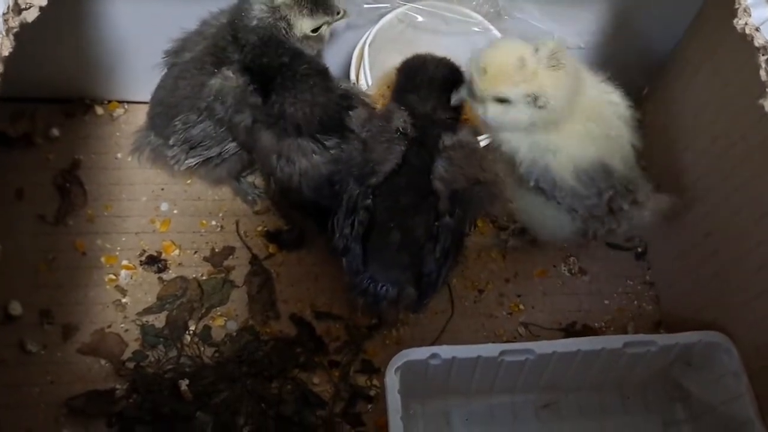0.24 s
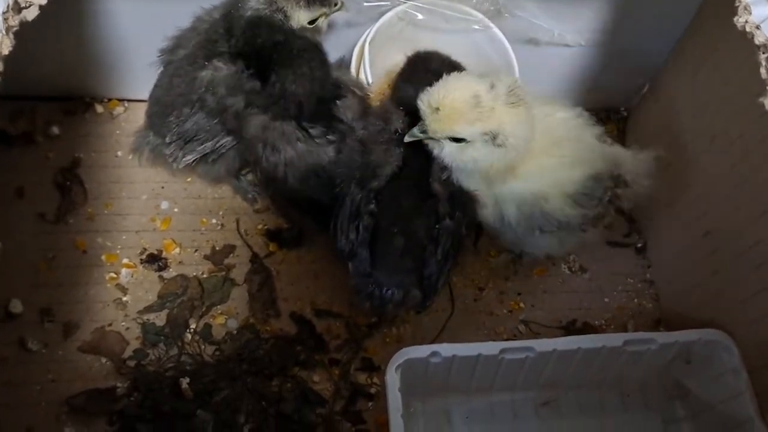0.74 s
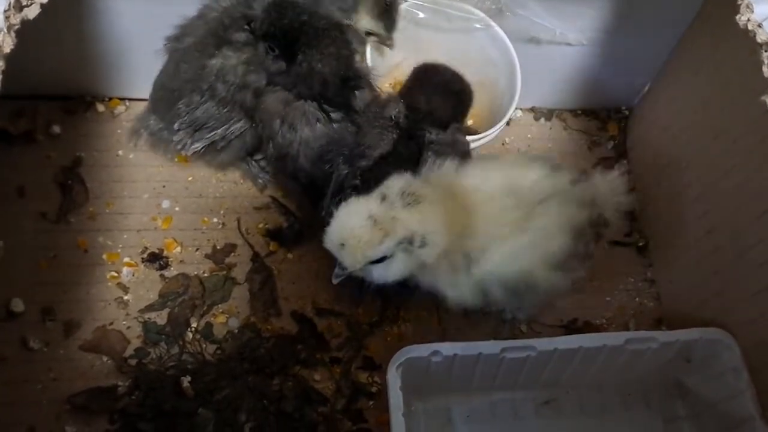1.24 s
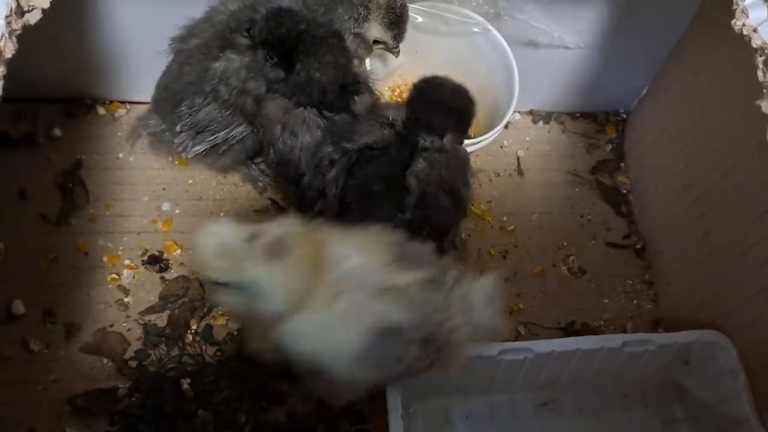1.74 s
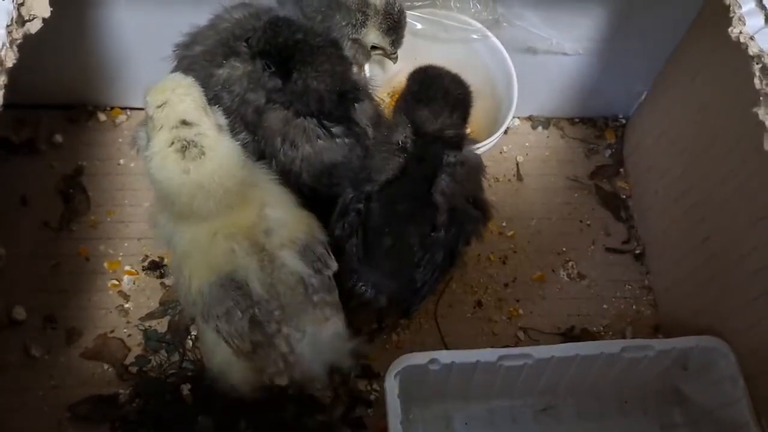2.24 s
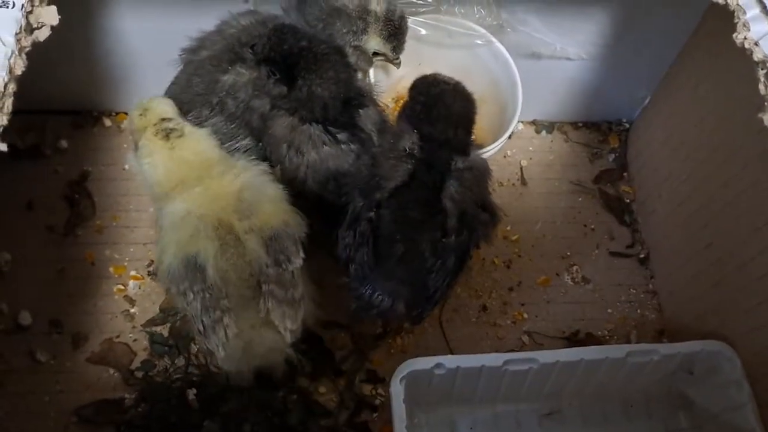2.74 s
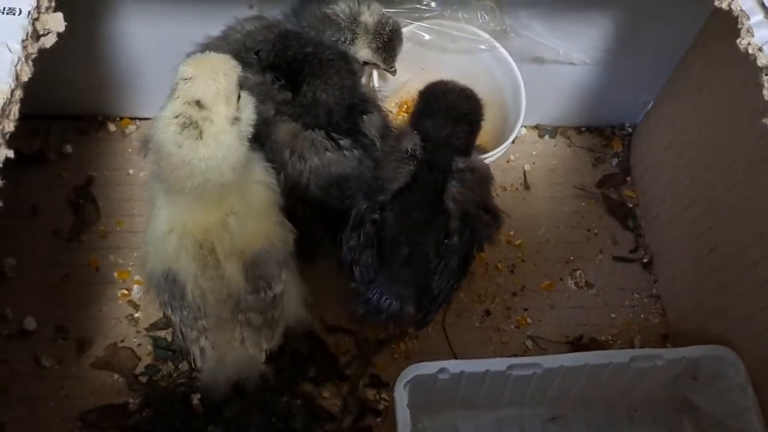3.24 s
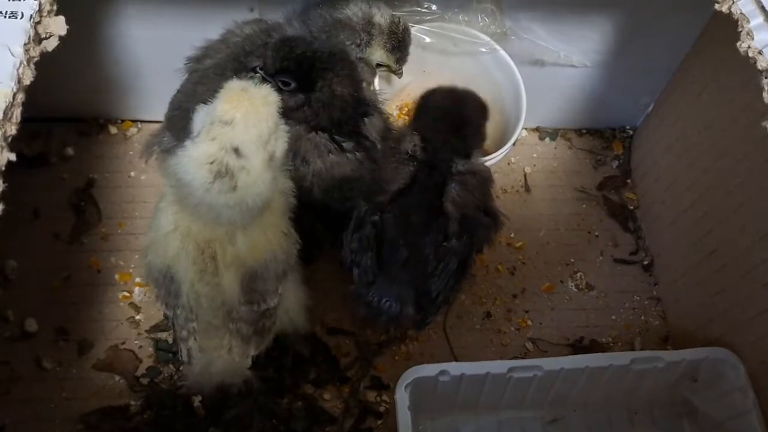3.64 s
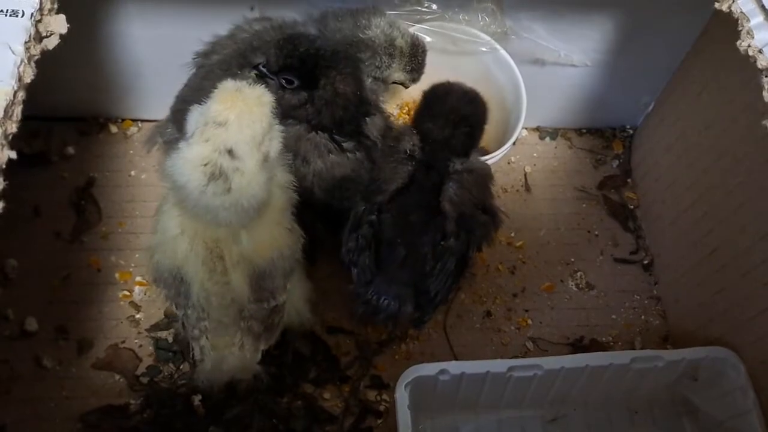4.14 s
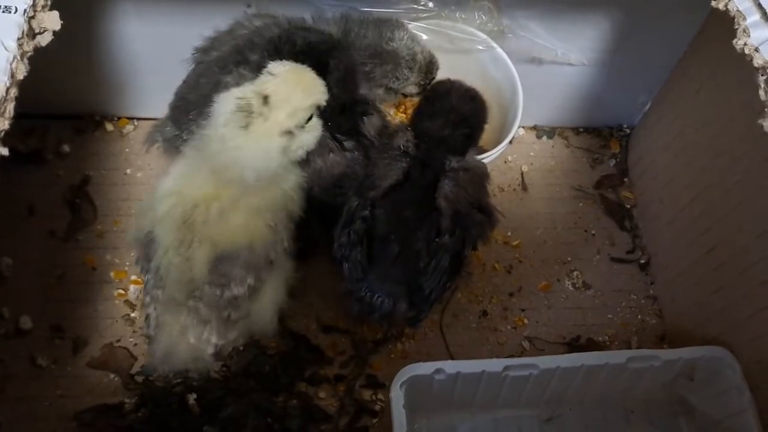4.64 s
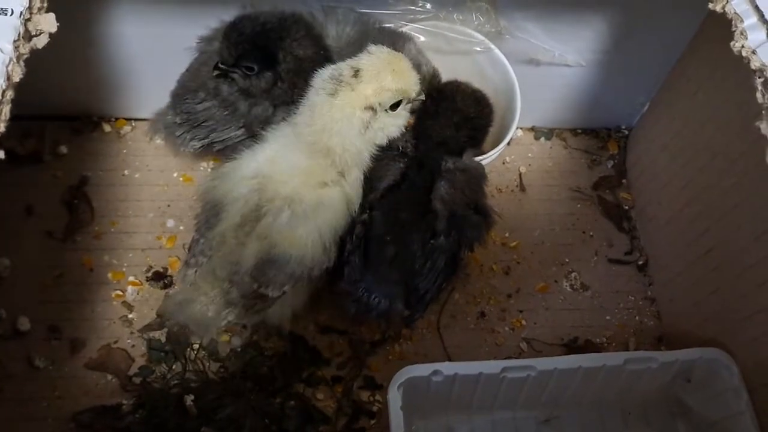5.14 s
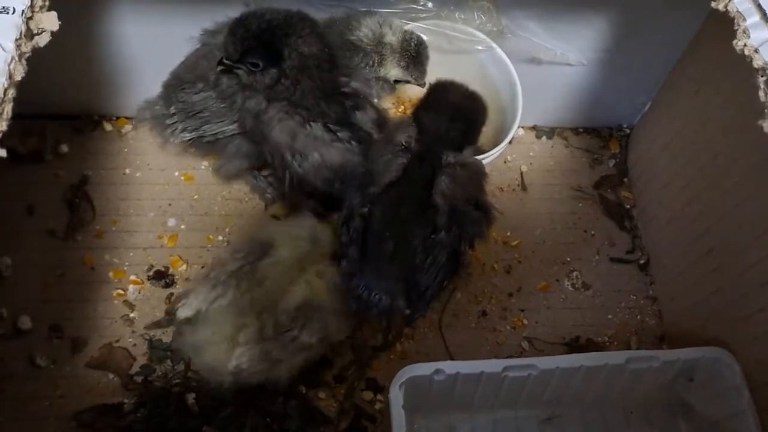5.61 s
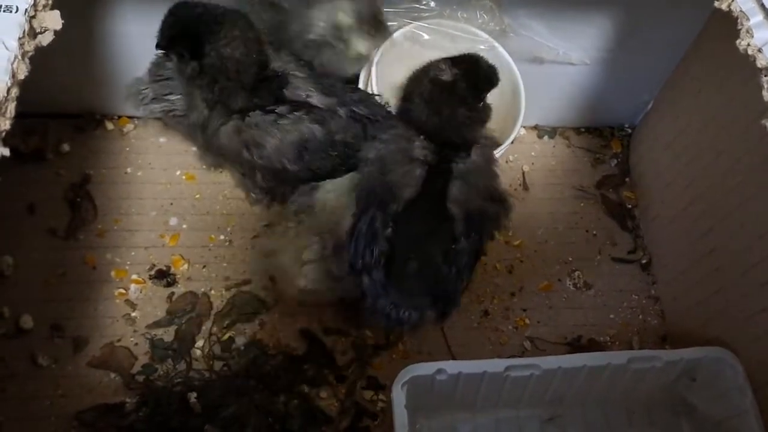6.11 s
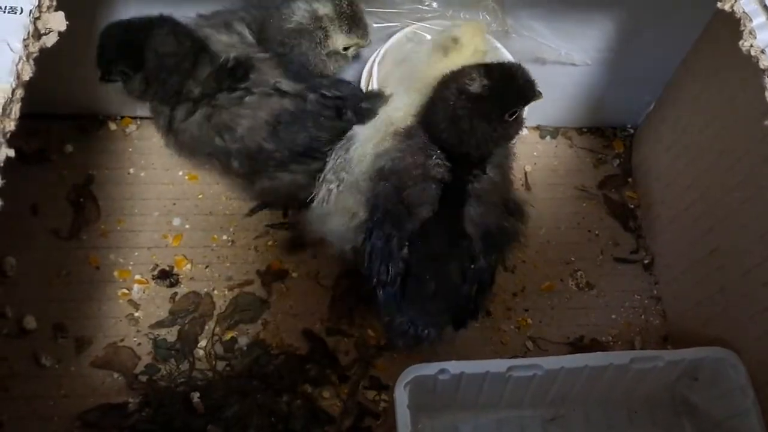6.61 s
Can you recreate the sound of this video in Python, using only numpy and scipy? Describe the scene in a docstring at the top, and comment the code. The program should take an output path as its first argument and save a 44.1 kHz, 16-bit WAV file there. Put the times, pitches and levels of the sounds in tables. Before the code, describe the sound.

Chicks jostle inside a cardboard box in a quiet room, heard in close stereo. Short dry scuffs, claw ticks and soft falling peeps come first, then a burst of hollow, drumming footfalls a little past two seconds. The movement thins to a near-still pause, light fidgeting resumes, and from five seconds scratching, thumps and quick peeps crowd together to the end.

```python
"""Chicks jostle round a plastic feed dish in a cardboard box, heard from close by in a quiet room.
Short scuffs and soft peeps come first: noise-burst grains make claws and feathers, gliding sines the peeps.
From 2.2 to 3 s footfalls drum hardest, pulses ringing the box modes; near 3.6 s the birds freeze.
Light fidgeting resumes, then from 5 s scuffs, footfalls and peeps crowd together to the end.
Noise-burst ticks, knocks and crumb snaps accompany the scuffs and echo off the walls, over a faint noise hush."""
import sys
import numpy as np
from scipy import signal
from scipy.fft import rfft, irfft
from scipy.io import wavfile
from scipy.ndimage import uniform_filter1d

SR = 44100
rng = np.random.default_rng(int(sys.argv[2]) if len(sys.argv) > 2 else 0)


def waveform_to_disk(signal):
    """Save audio, clipped to [-1, 1], as 16-bit WAV at the path in sys.argv[1]."""
    frames = np.transpose(np.atleast_2d(signal))
    scaled = np.clip(frames, -1, 1) * 32767
    samples = np.round(scaled).astype(np.int16)
    wavfile.write(sys.argv[1], SR, samples)


N = 302967
T = np.arange(N) / SR
CLAW_SHAPE = (0.027, 151)  # scuff rise [s], fall [dB/s]

# floor panel spectrum: (frequency [Hz], level [dB])
PANEL_SPECTRUM = [(200, -38), (320, -2.5), (400, -2), (510, 2), (630, 0.5), (790, -1.5), (1000, -10.5),
                  (1400, -9), (2200, -16.5), (4000, -35.5)]


def claws(scrape_db=-5.0, panel_db=-0.5):
    """Claws stick and slip on gritty cardboard; the same slips rattle the floor panel."""
    # claw scrape spectrum: (frequency [Hz], level [dB])
    scrape_spectrum = [(300, -46.5), (800, -1.5), (1300, 5), (1750, 4), (2300, 10), (3100, 10), (3700, 5.5),
                       (4400, 5.5), (5600, 0.5), (9000, -35), (11000, -31), (13500, -33), (16000, -2.5)]
    panel_shape = (0.019, 162)  # rise [s], fall [dB/s]
    slips = grains(per_s=1100, spread_db=1.0, clump_db=1.0, clumps_per_s=160)
    scrape = crackle(slips, scrape_spectrum, direct=0.093)
    scrape *= amp(scrape_db) * effort(CLAW_SHAPE, fidget_db=-59.5, column=2)
    panel = crackle(slips, PANEL_SPECTRUM, direct=0.07)
    panel *= amp(panel_db) * effort(panel_shape, fidget_db=-74.5, column=4)
    return scrape + panel


def feathers(hiss_db=-1):
    """Countless barbs flick past each other in a fine hiss."""
    # feather hiss spectrum: (frequency [Hz], level [dB])
    feather_spectrum = [(1000, -5), (4000, -1.5), (6000, -1.5), (7600, 2.5), (9200, 1), (10300, -6),
                        (12000, -12), (14000, -11), (16000, -20)]
    feather_shape = (0.029, 230)  # rise [s], fall [dB/s]
    barbs = grains(per_s=4500, spread_db=3.5, clump_db=1.66, clumps_per_s=120)
    hiss = crackle(barbs, feather_spectrum, direct=0.026)
    return amp(hiss_db) * effort(feather_shape, fidget_db=-60.5, column=3) * hiss


def crumbs(per_s=26, over_scrape_db=19, spread_db=3):
    """Grains of feed and dry litter snap under the feet, louder when the scraping is hard."""
    out, t = np.zeros((2, N)), np.arange(600) / SR
    scraping = effort(CLAW_SHAPE, fidget_db=-73.5, column=2)
    for place, size, shine in rng.random((round(per_s * N / SR), 3)):
        snap = rng.standard_normal(len(t)) * np.exp(-t / .0004)
        top_db = -30 + 18 * shine
        snap = colour(snap, [(300, -12.0), (1300, 13.0), (2500, -1.5), (4800, 3.0), (14000, top_db)])
        db = over_scrape_db + spread_db * min(-np.log(1 - size), 2.5)
        level = amp(db) * scraping[int(place * N)]
        add(out, place * N / SR, in_box(level * snap / np.linalg.norm(snap), box_db=-3))
    return out


def ticks(decay_s=0.0015, skid_s=0.011, crack_db=15, treble_db=9, low_db=-8, body_share=0.067):
    """Claw and beak ticks: a dead crack and brief skid, dull on cardboard, bright on grit or the dish."""
    # claw and beak ticks: (time [s], level [dB], brightness [dB], skid [dB])
    tick_table = [(0.103, -27.5, -13, -8), (0.3301, -34, -18, -20), (0.3796, -21.5, -22, -14),
                  (0.5011, -34, -10, -6), (0.6704, -29, -3, -3), (0.7047, -44, -15, -12),
                  (0.828, -37, 4, -11), (0.9956, -32.5, -6, -8), (1.017, -33.5, -5, -10),
                  (1.1087, -32, -20, -12), (1.1355, -32.5, -6, -16), (1.1772, -33, -17, -16),
                  (1.288, -41.5, -5, -9), (1.374, -34, -18, -12), (1.79, -32, -21, -20),
                  (1.9078, -30.5, -17, -12), (1.921, -31, -14, -13), (2.0322, -29, 3, -23),
                  (2.3224, -21.5, -33, -15), (2.611, -26, -30, -14), (2.829, -44, -47, -16),
                  (2.873, -46, -7, -16), (4.179, -39, -30, -23), (4.1875, -30.5, -39, -22),
                  (4.5481, -31, -23, -13), (4.7984, -31.5, -12, -14), (4.8464, -40, -2, -14),
                  (4.876, -43, -25, -18), (4.9715, -29.5, -8, -18), (4.9847, -20.5, -25, -6),
                  (5.08, -29.5, -13, -27), (5.1593, -24, -19, -16), (5.1854, -23.5, -35, -17),
                  (5.4668, -27, -5, -16), (5.5523, -27.5, -33, -20), (5.588, -28.5, -28, -18),
                  (5.7651, -31.5, -13, -14), (5.8377, -26, -57, -17), (5.868, -27, -51, -6),
                  (6.0218, -20.5, -17, -12), (6.106, -27, -22, -15), (6.175, -23, -34, -7),
                  (6.274, -24, -3, -5), (6.3323, -27, -3, -8), (6.3745, -31.5, -20, -3),
                  (6.8069, -28, -14, -3)]
    out, t = np.zeros((2, N)), np.arange(1500) / SR
    for s, db, bright_db, skid_db in tick_table:
        envelope = np.exp(-t / decay_s) + amp(skid_db) * np.exp(-t / skid_s)
        top_db = bright_db + treble_db
        body_db = low_db - body_share * top_db  # a dull blow bends the cardboard more
        spectrum = [(150, -14), (600, body_db), (1400, body_db), (2300, -1.0), (4700, 2),
                    (11000, top_db), (16000, top_db - 8.5)]
        crack = colour(rng.standard_normal(len(t)) * envelope, spectrum)
        add(out, s, in_box(amp(db + crack_db) * crack / np.linalg.norm(crack), box_db=-5.5))
    return out


def knocks(knock_db=20, decay_s=0.0028, panel_hz=510):
    """A hard stamp or peck rattles the floor panel for a few milliseconds, higher where it is stiff."""
    # knocks of foot or beak: (time [s], level [dB], pitch [Hz])
    knock_table = [(0.33, -29, 555), (0.705, -36.5, 1270), (1.222, -40, 1300), (2.398, -30, 513),
                   (2.606, -30, 505), (2.829, -29.5, 710), (2.862, -34, 1210), (2.966, -36.5, 1280),
                   (3.993, -45, 393), (4.749, -47, 1300), (5.025, -39.5, 507), (5.562, -27.5, 490),
                   (6.176, -24.5, 510), (6.37, -32.5, 494)]
    out, t = np.zeros((2, N)), np.arange(3000) / SR
    for s, db, pitch_hz in knock_table:
        spectrum = [(hz * pitch_hz / panel_hz, level) for hz, level in PANEL_SPECTRUM]
        rattle = colour(rng.standard_normal(len(t)) * np.exp(-t / decay_s), spectrum)
        add(out, s, in_box(amp(db + knock_db) * rattle / np.linalg.norm(rattle), box_db=-2.5))
    return out


def peeps(bend=.85, waver=0.0034, rasp_db=2, octave_db=-27, upper_db=-7, upper_gap=0.12, peep_db=1.5):
    """Nearly pure gliding whistles; a weaker second voice starts higher and fades as it joins the first."""
    # peeps: (time [s], length [s], first pitch [Hz], last pitch [Hz], level [dB])
    peep_table = [(0.022, .042, 3750, 3050, -44), (0.194, 0.072, 2400, 3540, -57),
                  (0.677, 0.052, 3700, 2765, -41.5), (0.841, 0.063, 3430, 2930, -44.5),
                  (.915, .07, 3750, 2750, -41), (1.015, .048, 3480, 2930, -40),
                  (1.355, .06, 4050, 3200, -36), (1.742, .063, 4300, 3000, -47),
                  (2.17, .05, 3950, 3200, -41), (3.012, .046, 3600, 2956, -40.5),
                  (3.776, 0.058, 3520, 2940, -49), (4.509, 0.051, 3650, 2910, -44),
                  (4.647, .045, 2250, 2800, -52), (4.708, .08, 3750, 2700, -49),
                  (5.215, .038, 3350, 2900, -50), (5.315, .05, 3700, 3000, -43),
                  (5.697, .026, 2560, 2330, -42), (5.765, .04, 3750, 3250, -47),
                  (5.908, .043, 2430, 2700, -52), (6.287, .037, 4000, 3100, -41),
                  (6.557, .035, 3280, 2900, -53.5), (6.646, 0.04, 3780, 3080, -35),
                  (6.683, 0.034, 3380, 2960, -40.5), (6.786, 0.068, 3650, 3070, -39.5)]
    out, pitch_noise, level_noise = np.zeros((2, N)), wander(500), wander(650)
    for s, length_s, first_hz, last_hz, db in peep_table:
        u = np.linspace(0, 1, round(length_s * SR))
        at = round(s * SR) + np.arange(len(u))
        glide = u ** (bend if last_hz < first_hz else 2)  # rising peeps curl up
        hz = first_hz * (last_hz / first_hz) ** glide * (1 + waver * pitch_noise[at])
        upper_hz = hz * (1 + upper_gap * (1 - u ** 2))
        phase, upper_phase = 2 * np.pi * np.cumsum([hz, upper_hz], axis=1) / SR
        voices = np.sin(phase) + amp(octave_db) * np.sin(2 * phase)
        voices += amp(upper_db) * (1 - u ** 2) * np.sin(upper_phase)
        swell = signal.windows.tukey(len(u), .45) * amp(db + peep_db + rasp_db * level_noise[at])
        add(out, s, in_box(swell * voices, box_db=-7))
    return out


def drumming(step_db=-5.5, patter_db=-4, side_db=-11):
    """Soft feet push on the floor: single footfalls and a patter of small shuffles ring the box."""
    # footfalls and bumps: (time [s], level [dB], contact time [s])
    step_table = [(0.352, -18.5, 0.0045), (0.369, -24.5, 0.0051), (1.123, -26, 0.005),
                  (1.798, -31.5, 0.0014), (1.987, -36, 0.0016), (2.225, -20.5, 0.0029),
                  (2.335, -12, 0.0033), (2.36, -10, 0.0027), (2.373, -17.5, 0.0081), (2.556, -21.5, 0.0037),
                  (2.752, -30, 0.0028), (2.972, -7.5, 0.004), (3.001, -20.5, 0.004), (3.354, -41.5, 0.0022),
                  (3.991, -33, 0.0013), (4.169, -35, 0.0033), (5.298, -16.5, 0.0041), (6.041, -15, 0.005),
                  (6.094, -16, 0.0039), (6.178, -10.5, 0.0045), (6.251, -17, 0.0041), (6.363, -23, 0.0012)]
    box_shape = (0.031, 170)  # rise [s], fall [dB/s]
    ring, steps = box_ring(), np.zeros(N)
    for s, db, contact_s in step_table:
        u = np.arange(900) / SR / contact_s
        push = np.sin(np.pi * np.minimum(u, 1))
        thud = signal.fftconvolve(ring, push)
        add(steps, s, amp(db + step_db) * thud / abs(thud).max())
    # the floor moves both ports alike, the side walls move them against each other
    floor, side = patter(ring), amp(side_db) * patter(ring)
    shuffling = amp(patter_db) * effort(box_shape, fidget_db=-67.5, column=5)
    return steps + shuffling * np.array([floor + side, floor - side])


def patter(ring):
    """Many small soft pushes on the box."""
    shuffles = grains(per_s=700, spread_db=2.0, clump_db=3.5, clumps_per_s=40)
    booms = signal.oaconvolve(shuffles, ring)[:N]
    return evened(colour(booms, [(40, 4.5), (80, 3.5), (300, -3.5), (700, -10.5), (1600, -40.5)]))


def box_ring():
    """The box's answer to one push: a sum of decaying modes."""
    # box modes: (frequency [Hz], level [dB], t60 [s])
    modes = [(77.8, -10, 0.11), (105.1, -6.5, 0.38), (142, -2.5, 0.19), (179.1, 9.5, 0.12),
             (200, -0.5, 0.1), (259.6, -7.5, 0.45), (410, -9.5, 0.056), (488, -37, 0.041),
             (615, -9.5, 0.029)]
    t = np.arange(SR // 2) / SR
    return sum(amp(db - 60 * t / t60) * np.cos(2 * np.pi * hz * t) for hz, db, t60 in modes)


def sway(hz=47, t60_s=0.6, rise_s=0.022):
    """The slow, deep flap of a whole wall: a decaying sine with a soft onset."""
    # wall sways: (time [s], level [dB])
    sway_table = [(0.58, -46), (2.02, -40), (2.332, -27), (2.55, -46), (3.03, -37.5), (5.299, -35),
                  (5.58, -48)]
    out, t = np.zeros(N), np.arange(SR) / SR
    flap = (1 - np.exp(-t / rise_s)) * np.sin(2 * np.pi * hz * t)
    for s, db in sway_table:
        add(out, s, amp(db - 60 * t / t60_s) * flap)
    return out


def hush(room_db=-67):
    """The quiet room: steady coloured noise, independent at each port."""
    # room noise spectrum: (frequency [Hz], level [dB])
    hush_spectrum = [(20, 9.5), (45, 10), (170, -5.5), (350, -11), (900, -14.5), (2500, -25), (4000, -34),
                     (4650, -7), (5700, -29), (9000, -11.5), (11000, -25), (16000, -17.5)]
    noises = rng.standard_normal((2, N))
    return amp(room_db) * np.array([evened(colour(noise, hush_spectrum)) for noise in noises])


def effort(shape, fidget_db, column):
    """How hard one part is worked, as a gain: its share of every scuff, over the light fidgeting."""
    # scuffs, one per shove or scratch: (start [s], length [s], claws [dB], feathers [dB],
    # floor panel [dB], whole box [dB])
    scuff_table = [(0.02, 0.086, -68, -50.5, -76, -57), (0.095, .07, -65, -46, -55, -50.5),
                   (0.261, .07, -39, -44.5, -55, -53), (0.322, 0.045, -35.5, -31.5, -42, -33.5),
                   (0.517, 0.071, -37, -41.5, -46, -40), (0.64, 0.033, -58, -55, -56, -44),
                   (0.818, 0.12, -51, -50, -55, -58), (0.893, 0.22, -51, -52.5, -59, -62),
                   (1.1, 0.049, -44, -48.5, -50, -42), (1.348, .075, -53, -33, -49.5, -42.5),
                   (1.592, 0.037, -50.5, -55, -56.5, -59), (1.783, 0.051, -42.5, -56, -47.5, -46.5),
                   (1.894, 0.019, -40, -43.5, -54, -48), (1.95, 0.068, -44.5, -57, -47.5, -39.5),
                   (2.042, 0.25, -46, -45, -49, -44), (2.19, 0.057, -34, -37, -46, -30),
                   (2.25, 0.037, -44, -35, -54, -46), (2.313, 0.12, -32.5, -35, -36.5, -24),
                   (2.44, 0.11, -47, -43.5, -42, -41), (2.554, 0.068, -38, -41.5, -45.5, -30),
                   (2.717, 0.13, -43.5, -53, -51, -40.5), (2.818, 0.041, -38.5, -45, -38.5, -43),
                   (2.872, 0.039, -42, -47.5, -45, -40), (2.944, 0.066, -43.5, -58, -53, -27),
                   (3.337, 0.02, -49, -64, -56.5, -36.5), (3.776, 0.086, -57, -56.5, -82, -60.5),
                   (3.904, .055, -51, -59, -63, -53), (3.98, .07, -52, -54, -54, -44),
                   (4.143, 0.072, -42.5, -59, -62, -42.5), (4.3, 0.15, -76, -49, -87, -62),
                   (4.42, 0.049, -56, -50, -59.5, -61), (4.514, 0.085, -52.5, -51.5, -76, -60),
                   (4.733, 0.033, -51.5, -68, -81, -55.5), (4.837, 0.095, -54, -50.5, -59, -53),
                   (4.92, 0.1, -42.5, -50, -62, -46), (5.016, 0.055, -43, -56, -47.5, -49),
                   (5.074, 0.065, -48, -57, -49.5, -40), (5.138, 0.066, -38, -41, -39.5, -34.5),
                   (5.238, 0.18, -53, -46.5, -53.5, -44.5), (5.465, 0.068, -40, -46, -46, -39),
                   (5.538, 0.051, -39, -55, -41.5, -34), (5.6, 0.13, -44, -49.5, -47, -54),
                   (5.75, 0.1, -39, -48.5, -50, -44.5), (6.016, 0.17, -36.5, -37, -40.5, -28),
                   (6.148, 0.058, -37, -35.5, -38, -29.5), (6.224, 0.051, -37, -41, -42.5, -29),
                   (6.357, 0.045, -46, -47.5, -45.5, -36.5), (6.503, 0.21, -52, -53.5, -55, -45),
                   (6.617, 0.041, -41.5, -40.5, -44, -39), (6.708, 0.054, -49, -57.5, -64, -55),
                   (6.785, 0.048, -46.5, -53.5, -47.5, -37.5)]
    # light fidgeting, with a freeze in the middle: (time [s], level [dB])
    fidget_table = [(0, -0.5), (.05, 5), (1.25, 5.5), (1.72, 1.5), (2.1, 4), (2.9, 2), (3.3, 0.5),
                    (3.55, -18), (3.72, -17), (3.85, 2.5), (4.7, 2.5), (5.3, 9), (6.87, -2.5)]
    rise_s, fall_db_per_s = shape
    power = amp(fidget_db + np.interp(T, *np.transpose(fidget_table))) ** 2
    t = np.arange(SR) / SR
    for scuff in scuff_table:
        start_s, length_s = scuff[:2]
        fall_db = fall_db_per_s * np.maximum(t - length_s, 0)
        gain = np.minimum(t / rise_s, 1) * amp(scuff[column] - fall_db)
        add(power, start_s, gain ** 2)
    return np.sqrt(power)


def grains(per_s, spread_db, clump_db, clumps_per_s):
    """Tiny slips of random size that come in clumps."""
    size = amp(spread_db * np.minimum(rng.exponential(1, N), 5))
    slips = rng.choice([-1., 1.], N) * size * (rng.random(N) < per_s / SR)
    return evened(slips * amp(clump_db * wander(clumps_per_s)))


def crackle(slips, spectrum, direct, slip_s=.0004, echo_s=.011, echo_share=.55):
    """Every slip is a tiny burst of noise, with a short tail from the cardboard walls."""
    t = np.arange(2000) / SR
    burst = (1 - echo_share) * np.exp(-t / slip_s) / slip_s
    tail = echo_share * np.exp(-t / echo_s) / echo_s
    envelope = np.sqrt(abs(signal.oaconvolve(slips ** 2, burst + tail)[:N]))  # the decays are of power
    return evened(np.array([colour(envelope * noise, spectrum) for noise in port_noise(direct)]))


def port_noise(direct, shared_hz=480):
    """Noise at both ports: the direct share is alike at both; of the echoes only long waves are alike."""
    straight, left, right = rfft(rng.standard_normal((3, N)))
    hz = np.fft.rfftfreq(N, 1 / SR)
    same = 1 / (1 + (hz / shared_hz) ** 4)
    diffuse = np.array([left, same * left + np.sqrt(1 - same ** 2) * right])
    return irfft(np.sqrt(direct) * straight + np.sqrt(1 - direct) * diffuse, N)


def in_box(sound, box_db, box_t60_s=0.081, room_db=-15, room_t60_s=0.36):
    """One sound from one spot: straight to both ports, then dense echoes of the box and a faint room."""
    t = np.arange(12000) / SR
    taps = rng.standard_normal((2, 2, len(t))) * (t > .0005)
    near, far = taps[0] * amp(-60 * t / box_t60_s), taps[1] * amp(-60 * t / room_t60_s)
    answer = amp(box_db) * near / np.linalg.norm(near[0]) + amp(room_db) * far / np.linalg.norm(far[0])
    answer[0, 0] += 1
    answer[1, round(.00043 * SR)] += 1  # the right port hears it 0.43 ms later
    return signal.fftconvolve(sound[None], answer, axes=1)


def patchy(x, depth_db, patch_size=9):
    """The colour drifts from moment to moment as the birds rub at ever new spots."""
    z = signal.stft(x, nperseg=512, noverlap=384)[2]
    field = rng.standard_normal(z.shape[1:])
    for axis in (0, 1):  # frequency, then time
        field = uniform_filter1d(field, patch_size, axis=axis)
    return signal.istft(z * amp(depth_db * evened(field)), nperseg=512, noverlap=384)[1][:, :N]


def colour(x, points, size=2048):
    """Causal (minimum-phase) filter with the given spectrum."""
    log_gain = np.log(amp(read(points, abs(np.fft.fftfreq(size, 1 / SR)))))
    taps = np.fft.ifft(np.exp(np.conj(signal.hilbert(log_gain)))).real
    return signal.oaconvolve(x, taps)[:len(x)]


def read(points, hz):
    """A spectrum, joined on a log-frequency axis."""
    f, value = np.transpose(points)
    return np.interp(np.log(hz + 1), np.log(f), value)


def wander(per_s):
    """Random values joined by straight lines, scaled to an rms of 1."""
    knots = rng.standard_normal(8000)
    return evened(np.interp(T * per_s, np.arange(len(knots)), knots))


def amp(db):
    """Decibels as a gain."""
    return 10 ** (np.asarray(db) / 20)


def evened(x):
    """Scaled to an rms of 1."""
    return x / np.sqrt(np.mean(x ** 2) + 1e-20)


def add(mix, s, sound):
    """Mixes a sound in at a time [s], cut off at the end."""
    part = mix[..., round(s * SR):][..., :sound.shape[-1]]
    part += sound[..., :part.shape[-1]]


def scene():
    """Rustling, snaps and knocks, peeps and the booming box, over the quiet room."""
    rustle = patchy(claws() + feathers(), depth_db=1.5)
    return rustle + crumbs() + ticks() + knocks() + peeps() + drumming() + sway() + hush()


def record(dry, bass_cut_hz=40, edge_hz=16000):
    """Each microphone port has its own colour; then the bass cut and the band limit."""
    # left over right port: (frequency [Hz], level [dB])
    port_table = [(100, 1), (600, 3.5), (1400, 1), (2200, -2.5), (4500, -4), (6500, 0), (9200, 4),
                  (10700, 0), (13000, 5.5), (15800, -4)]
    ports = [colour(x, [(hz, side * db / 2) for hz, db in port_table]) for x, side in zip(dry, (1, -1))]
    bass_cut = signal.butter(6, bass_cut_hz, "highpass", fs=SR, output="sos")
    band_limit = signal.firwin(511, edge_hz, window=("kaiser", 9), fs=SR)
    return signal.oaconvolve(signal.sosfilt(bass_cut, ports), band_limit[None], "same")


dry = scene()
out = record(dry)
waveform_to_disk(out)
```